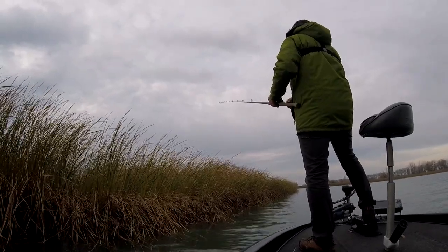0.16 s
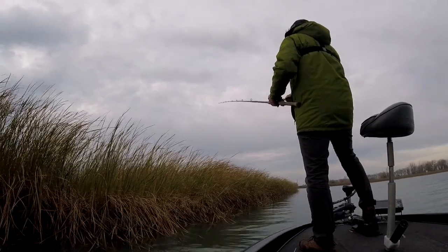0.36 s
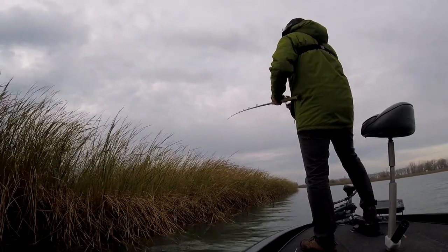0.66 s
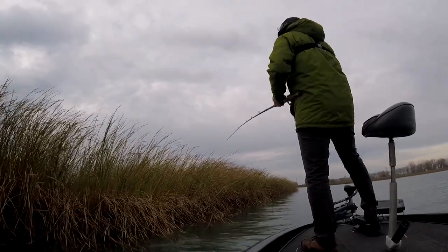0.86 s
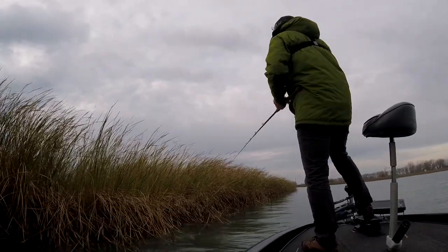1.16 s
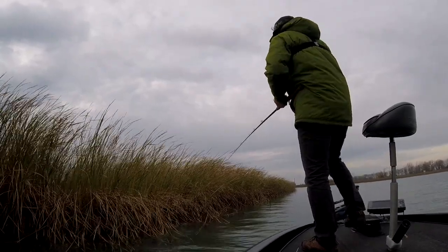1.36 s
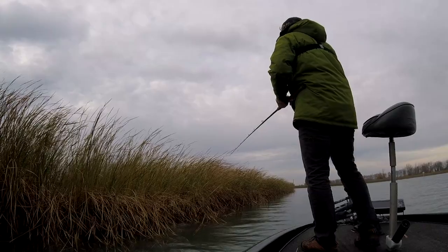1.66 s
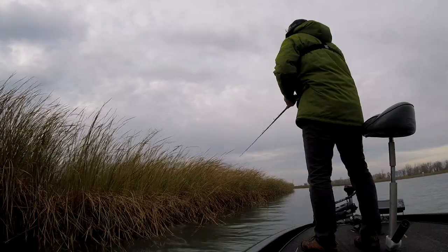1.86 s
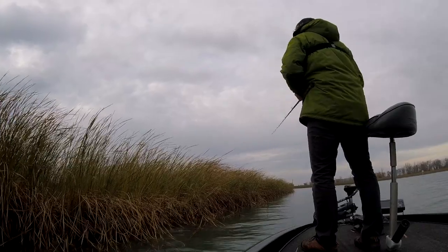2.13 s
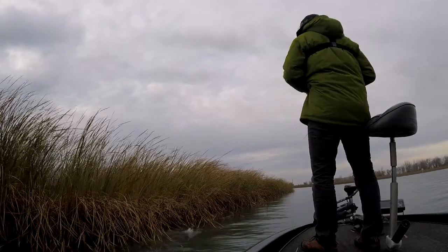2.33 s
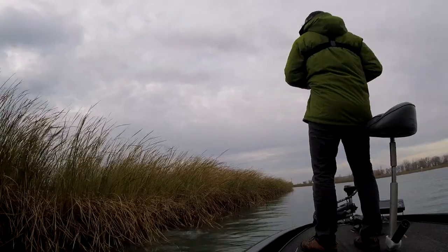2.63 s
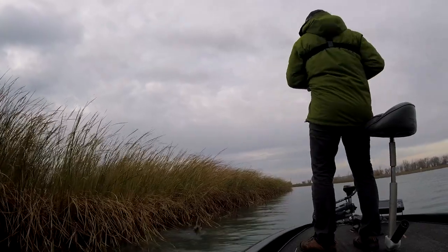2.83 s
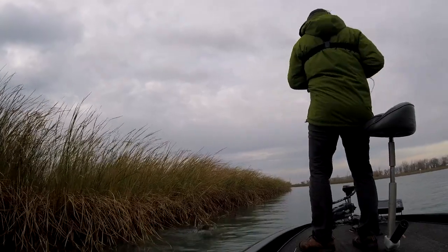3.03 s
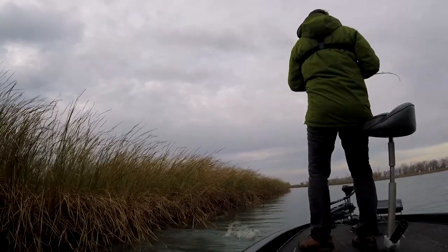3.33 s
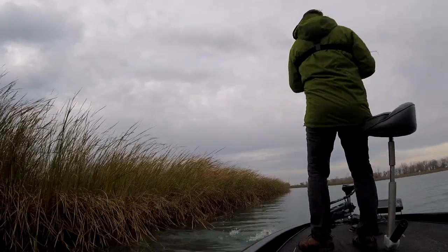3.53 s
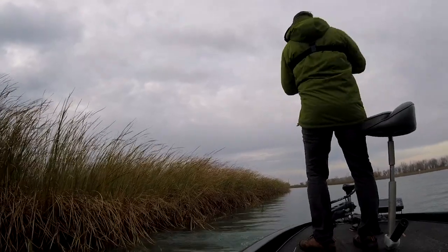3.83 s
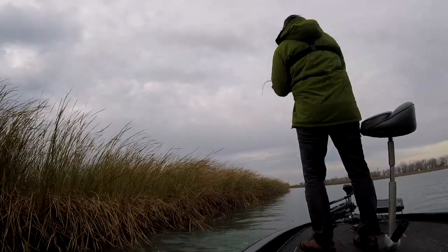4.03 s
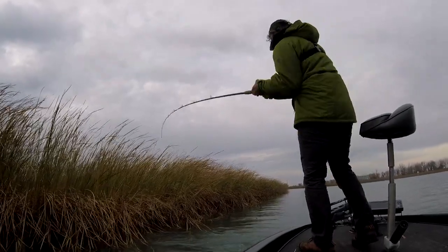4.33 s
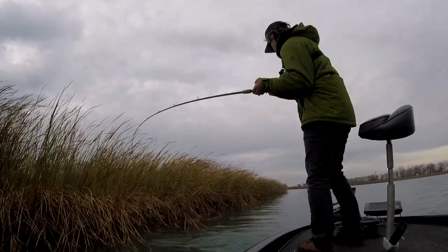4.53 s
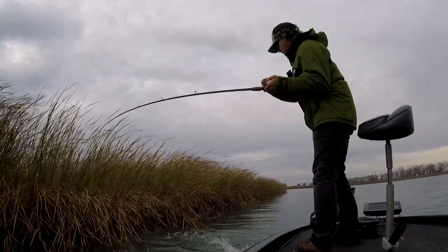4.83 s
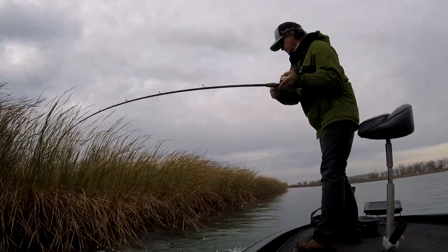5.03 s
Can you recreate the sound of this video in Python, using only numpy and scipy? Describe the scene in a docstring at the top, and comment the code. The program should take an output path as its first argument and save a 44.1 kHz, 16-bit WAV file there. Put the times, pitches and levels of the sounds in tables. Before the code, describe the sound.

A boat hull booms low under wind rumble, heavy footfalls thump the hollow deck, then water splashes and plops alongside with small tackle clicks.

```python
"""A small fishing boat lies by a reed bed on a windy lake, heard through a microphone in a closed case on the hull.
From the start the hull booms at two resonances, shaped noise gives wind and reeds, and a faint hum soon dies.
Crowds of bubbles lap beside the hull; single bubbles plop, tackle clicks as ringing partials, and from 0.9 s
feet thump on the modes of the hollow deck. The water breaks into splashing near 2 s and again from about 3 s,
while the boom and the wind grow weaker overall; a few last thumps fall near 5 s."""
import sys
import numpy as np
from scipy import signal
from scipy.fft import rfft, irfft, next_fast_len
from scipy.io import wavfile
from scipy.ndimage import uniform_filter1d

SR = 44100
rng = np.random.default_rng(int(sys.argv[2]) if len(sys.argv) > 2 else 0)


def transcribe(u):
    """Save the signal u as a 16-bit wav file named by the first command-line argument.

    u: samples, shape (n,) or (channels, n), limited to [-1, 1]; the rate is SR.
    q: integer samples, one column per channel.
    """
    v = np.clip(np.atleast_2d(u).T, -1, 1)
    q = np.round(v * 32767).astype(np.int16)
    wavfile.write(sys.argv[1], SR, q)


N = 228526
T = np.arange(N) / SR


def undb(db):
    """Logarithmic level: decibels to amplitude gain."""
    return 10 ** (np.asarray(db) / 20)


def unit(x):
    """Power normalization: scale to rms 1."""
    return x / np.sqrt(np.mean(x ** 2))


def gains(table):
    """Level envelope: interpolate each dB column over time and return it as gains."""
    seconds, *columns = np.transpose(table)
    return [undb(np.interp(T, seconds, column)) for column in columns]


def add(out, start_s, x):
    """Superposition: mix x into out from start_s."""
    i = max(int(start_s * SR), 0)
    out[i:i + len(x)] += x[:max(N - i, 0)]


def fade(t, t60):
    """Exponential damping: 60 dB down after t60 seconds."""
    return np.exp(-np.log(1000) * t / t60)


def swell(start_s, attack_s, hold_s, t60):
    """Build-up and decay of energy: a smooth rise, a hold and an exponential release."""
    rise = np.sin(np.pi / 2 * np.clip((T - start_s) / attack_s, 0, 1)) ** 2
    return rise * fade(np.maximum(T - start_s - attack_s - hold_s, 0), t60)


def walk(rate):
    """Random modulation: smoothed noise of rms 1, with a fresh value rate times a second."""
    k = int(SR / rate)
    steps = np.repeat(rng.standard_normal(N // k + 1), k)
    smooth = uniform_filter1d(uniform_filter1d(steps, k), k)
    return unit(smooth[:N])


def colour(x, points):
    """Minimum-phase filtering: a causal response through (Hz, dB) points."""
    size = next_fast_len(len(x) + 4096, True)
    hz, db = np.transpose(points)
    f = np.maximum(np.arange(size // 2 + 1) * SR / size, 1)
    log_gain = np.log(undb(np.interp(np.log(f), np.log(hz), db)))
    # folding the cepstrum onto positive times makes the filter causal
    cepstrum = irfft(log_gain, size)
    cepstrum[1:size // 2] *= 2
    cepstrum[size // 2 + 1:] = 0
    response = np.exp(rfft(cepstrum))
    return irfft(rfft(x, size) * response, size)[:len(x)]


def bubble(hz, rise, swell_s):
    """Bubble resonance: a sine swells, rings and dies while its pitch glides by rise octaves."""
    age = np.arange(int(8 * swell_s * SR) + 2) / (swell_s * SR)
    pitch = hz * 2 ** (rise * np.tanh(age / 4))
    envelope = (age * np.exp(1 - age)) ** 1.18
    return envelope * np.sin(2 * np.pi * np.cumsum(pitch) / SR)


def froth(low_hz, high_hz, cycles, spread_db, count, wash_db=1, longest=5):
    """Incoherent summation: many random bubbles over white noise; spread_db sets how their strengths vary."""
    out = np.zeros(N)
    for when, size, rise, life, force in rng.random((count, 5)):
        hz = low_hz * (high_hz / low_hz) ** size
        # a positive spread makes a few bubbles stronger, a negative one makes a few weaker
        strength = undb(spread_db * min(-np.log(1 - force), 4))
        # most bubbles are brief, a few ring on
        stretch = longest ** (life * life) / 2
        add(out, when * T[-1], strength * bubble(hz, 0.42 * rise - .1, cycles * stretch / hz))
    return unit(out) + undb(wash_db) * rng.standard_normal(N)


# Steady rocking of the hull. Each row: time in seconds, level in dB.
HULL_ROCKING = [(0.0, -27.5), (0.5, -32.5), (1.1, -30.5), (1.6, -19), (1.9, -41.5), (2.55, -31.5),
                (2.8, -41.5), (3.3, -39), (3.85, -38), (4.15, -52), (4.55, -51), (4.8, -40), (5.18, -43)]
# Shoves of waves and shifting weight on the hull. Each row: start in seconds, level in dB,
# length of rise and hold in seconds, second resonance over the first in dB.
HULL_SHOVES = [(1.085, -16, 0.17, -11.5), (1.34, -14.5, 0.13, -2.5), (1.599, -10.5, 0.11, -8.5),
               (1.722, -14, .11, -14), (1.976, -25.5, 0.33, -5.5), (2.309, -20.5, .14, -10.5),
               (2.80, -31, 0.07, -9), (3.07, -30.5, 0.16, 3), (4.582, -33, 0.15, -2.5),
               (4.978, -27, 0.12, 6)]
SHOVE_ATTACK_S, HULL_T60_S = 0.074, .36


def hull(first_hz=47.15, second_hz=65.8, wander=0.0656, rocking_upper_db=-12, uneven_db=2.5):
    """Forced resonance: rocking and shoves drive two wandering low modes; each shove swells and rings out."""
    rocking = gains(HULL_ROCKING)[0] * undb(uneven_db * walk(24.08))
    drives = [(rocking, rocking_upper_db)]
    for start_s, db, length_s, upper_db in HULL_SHOVES:
        shove = swell(start_s, SHOVE_ATTACK_S, length_s - SHOVE_ATTACK_S, HULL_T60_S)
        drives.append((undb(db) * shove, upper_db))
    # each drive shares its power between the two resonances
    power = np.zeros((2, N))
    for drive, upper_db in drives:
        upper = undb(upper_db) ** 2
        power += np.outer([1, upper], drive ** 2) / (1 + upper)
    modes = []
    for hz in (first_hz, second_hz):
        pitch = hz * (1 + wander * walk(35))
        modes.append(unit(np.sin(2 * np.pi * np.cumsum(pitch) / SR)))
    return np.sum(np.sqrt(power) * modes, axis=0)


# Wind buffeting the case. Each row: time in seconds, level in dB before the gain wind_db.
WIND_GUSTS = [(0.0, -44), (0.8, -41), (1.05, -35), (1.65, -32.5), (2.05, -41), (2.85, -46), (3.2, -50.5),
              (4.1, -58), (4.55, -54), (4.68, -49.5), (5.18, -56)]
# Spectrum of the buffeting. Each row: frequency in Hz, relative level in dB.
WIND_COLOUR = [(15, -27.5), (45, 9.5), (70, 9), (100, 4.5), (130, 2.5), (165, -5), (198, 2.5), (235, -13),
               (400, -20), (2000, -59)]


def wind(wind_db=3):
    """Turbulent pressure: eddies buffet the case with a low rumble, as filtered noise under a gust envelope."""
    gust, = gains(WIND_GUSTS)
    return undb(wind_db) * gust * unit(colour(rng.standard_normal(N), WIND_COLOUR))


# Spectrum of the distant reeds. Each row: frequency in Hz, relative level in dB.
REED_COLOUR = [(250, -3.5), (450, -1), (700, -16.5), (1400, -12), (3000, -21.5), (4100, -27.5),
               (5400, -20.5), (7500, -17), (10000, -21.5), (12000, -26.5), (15000, -30)]


def reeds(level_db=-59, sway_db=0.85):
    """Broadband flow noise: wind in the reed bed hisses as filtered noise that sways slightly in level."""
    return unit(colour(rng.standard_normal(N), REED_COLOUR)) * undb(level_db + sway_db * walk(3.7))


def hum(hz=150.6, second_db=-55, third_db=-61):
    """Harmonic series: partials two and three of a wavering tone, perhaps an electric bow motor, fade out."""
    phase = 2 * np.pi * np.cumsum(hz * (1 + 0.0072 * walk(11.8))) / SR
    tone = undb(second_db) * np.sin(2 * phase) + undb(third_db) * np.sin(3 * phase)
    return tone * np.interp(T, [.5, 1.1], [1, 0])


# Water that never stops lapping, before the gains in water(): slosh, splatter and spray levels in dB.
LAPPING_LEVELS = (-60, -68, -76)
# Surges beside the hull. Each row: start in seconds, build-up in seconds, ebb t60 in seconds, then,
# before the gains in water(), slosh of large bubbles in dB, splatter of small bubbles in dB, spray in dB.
WATER_SURGES = [(0.40, .08, 2.6, -64, -60.5, -62), (0.62, .36, .4, -55, -59, -62),
                (1.34, 0.071, 1.4, -53, -62, -72.5), (1.86, 0.11, 0.58, -56, -63, -67),
                (2.059, 0.11, 0.45, -51, -49.5, -52), (2.31, .10, 0.54, -61, -57, -65.5),
                (2.73, 0.055, 1.5, -64, -57.5, -76), (2.86, .15, 0.79, -56, -49.5, -55.5),
                (3.13, 0.068, 0.51, -60, -47.5, -48.5), (3.25, 0.056, 1.16, -46.5, -45, -54.5),
                (3.38, 0.17, 2.6, -43.5, -47.5, -54.5), (3.56, 0.21, 1.26, -43, -46.5, -56.5),
                (3.95, 0.19, 3.1, -65, -56, -62), (4.28, 0.1, 1.56, -44.5, -49, -62),
                (4.42, 0.28, 0.88, -39, -56, -52.5), (4.80, 0.27, 0.5, -38.5, -47, -45.5)]
CREST_SHARE = .5  # a surge stays at its crest for this share of its build-up


def surges():
    """Addition of powers: each surge builds, crests and ebbs over the steady lapping, in three bands."""
    power = undb(LAPPING_LEVELS)[:, None] ** 2
    for start_s, build_s, ebb_t60, *levels_db in WATER_SURGES:
        surge = swell(start_s, build_s, CREST_SHARE * build_s, ebb_t60)
        power = power + np.outer(undb(levels_db), surge) ** 2
    return np.sqrt(power)


# Slaps of water. Each row: start in seconds, initial rms of slosh and splatter together in dB before
# the gains in water(), t60 in seconds, splatter over slosh in dB.
WATER_SLAPS = [(2.119, -46, 0.073, 0), (2.179, -43, 0.061, 16), (2.220, -42.5, 0.057, 23),
               (2.417, -40, 0.035, -11), (3.074, -39, 0.055, 12), (3.203, -43, 0.047, 29),
               (3.227, -36.5, 0.02, 17), (3.29, -32.5, 0.086, -4), (3.576, -41, 0.022, 16),
               (3.827, -37.5, 0.22, -19), (4.012, -41.5, 0.037, -20), (4.610, -37, 0.072, -37),
               (4.725, -38, 0.12, -14), (4.808, -29.5, 0.07, -14), (4.914, -39, 0.12, -11),
               (4.947, -35.5, 0.092, -30)]
# Slosh at the side of the hull. Each row: frequency in Hz, relative level in dB.
SLOSH_SIDE_COLOUR = [(110, -15), (180, 4.5), (300, -6.5), (430, -4), (650, 3.5), (1100, 1.5), (2500, -43.5)]
# Slosh at the bow. Each row: frequency in Hz, relative level in dB.
SLOSH_BOW_COLOUR = [(130, -19), (220, 2.5), (300, -3.5), (450, -5), (680, 3.5), (1000, 1.5), (1400, -2),
                    (3000, -36.5)]
# Splatter, and the wet splat of a plop. Each row: frequency in Hz, relative level in dB.
SPLATTER_COLOUR = [(600, -18.5), (1200, -6.5), (2000, -1), (2700, -1), (3400, -2.5), (4100, -12.5),
                   (5000, -27.5)]
# Spray at the side of the hull. Each row: frequency in Hz, relative level in dB.
SPRAY_SIDE_COLOUR = [(3500, -9.5), (4900, -17), (5900, -2.5), (6800, -7), (8000, -16.5), (10000, -22.5),
                     (12000, -35), (15000, -30.5)]
# Spray at the bow. Each row: frequency in Hz, relative level in dB.
SPRAY_BOW_COLOUR = [(3000, -29.5), (4200, -11), (5100, -3), (5800, -2), (7000, -8.5), (10000, -10.5),
                    (11500, -28), (15000, -31)]


def water(slosh_db=1, splatter_db=0, spray_db=-1, surge_db=1.13, slap_spray_db=-9, turn_s=4.45):
    """Size sets pitch: large bubbles gurgle, small ones splatter, spray fizzes; slaps add bursts of all three."""
    slosh, splatter, spray = surges()
    t = T[:SR // 4]
    for start_s, db, t60, bright_db in WATER_SLAPS:
        burst = undb(db) * fade(t, t60) / np.hypot(1, undb(bright_db))
        add(slosh, start_s, burst)
        add(splatter, start_s, burst * undb(bright_db))
        add(spray, start_s, burst * undb(bright_db + slap_spray_db))
    large = froth(174.7, 1560, cycles=1.06, spread_db=3.0, count=5000)
    small = froth(1099.4, 3995, cycles=2.94, spread_db=1.5, count=6000)
    drops = froth(3870, 13000, cycles=3.04, spread_db=-2.5, count=8000)
    # the colour changes as the splashing moves from the bow to the side of the hull and back
    side = np.interp(T, [1.5, 1.9, turn_s, turn_s + 0.04], [0, 1, 1, 0])
    bow = 1 - side
    gurgle = side * unit(colour(large, SLOSH_SIDE_COLOUR)) + bow * unit(colour(large, SLOSH_BOW_COLOUR))
    patter = unit(colour(small, SPLATTER_COLOUR))
    fizz = side * unit(colour(drops, SPRAY_SIDE_COLOUR)) + bow * unit(colour(drops, SPRAY_BOW_COLOUR))
    mix = undb(slosh_db) * slosh * gurgle
    mix += undb(splatter_db) * splatter * patter
    mix += undb(spray_db) * spray * fizz
    return mix * undb(surge_db * walk(60))


# Single plops. Each row: start in seconds, starting pitch in Hz, pitch glide in octaves (negative falls),
# swell time in ms, level of the main bubble in dB.
WATER_PLOPS = [(0.576, 1670, 0.51, 3.3, -41), (0.813, 878, 0.25, 14, -49), (2.853, 1886, -0.17, 3.2, -41.5),
               (2.9428, 843, 0.93, 3.3, -28), (3.3005, 1960, 0.067, 0.69, -17),
               (3.346, 1120, 0.74, 1.7, -29.5), (3.456, 606, 0.83, 3.7, -35), (3.494, 229, -0.7, 4.5, -22),
               (3.516, 1660, 0.26, 2.2, -34.5), (3.569, 294, 0.83, 5.6, -32), (4.400, 790, -0.19, 3.6, -35),
               (4.428, 248.4, 0.68, 15, -32), (4.648, 327, -0.62, 4.1, -26.5),
               (4.668, 366, -0.23, 2.5, -27), (4.722, 860, -0.66, 2.8, -27.5), (4.727, 262, 0.63, 3.1, -27),
               (4.800, 301, -0.051, 4.4, -31), (4.950, 676, -0.043, 12, -36)]


def plops(splat_db=-18, splat_t60=0.0089, companion=1.8, companion_db=-13):
    """Pinch-off of air pockets: each rings as a bubble with a weaker, higher companion and a short wet splat."""
    out, t = np.zeros(N), T[:SR // 8]
    for start_s, hz, rise, swell_ms, db in WATER_PLOPS:
        swell_s = swell_ms / 1000
        splat = unit(colour(rng.standard_normal(len(t)), SPLATTER_COLOUR)) * fade(t, splat_t60)
        add(out, start_s, undb(db) * bubble(hz, rise, swell_s))
        add(out, start_s, undb(db + companion_db) * bubble(companion * hz, rise, swell_s))
        add(out, start_s, undb(db + splat_db) * splat)
    return out


# Clicks of tackle. Each row: start in seconds, peak level in dB, ring t60 in seconds.
TACKLE_CLICKS = [(0.589, -41.5, 0.059), (0.9, -26, 0.035), (1.256, -37, 0.017), (1.3109, -27.5, 0.15),
                 (2.006, -42, 0.015), (2.327, -39, 0.022), (2.472, -46, .015), (2.489, -36.5, 0.0078),
                 (4.165, -31, 0.012), (4.729, -26.5, 0.042), (4.81, -35, 0.06), (4.957, -28.5, 0.048),
                 (5.048, -29, 0.018)]
# Partials of the tackle. Each row: frequency in Hz, relative level in dB.
TACKLE_MODES = [(1610, -1), (2875, -8.5), (4690, -13.5), (5000, 3.5), (5200, -2.5), (5530, 0), (6050, -14)]
# Crack of a hard contact, on tackle or deck. Each row: frequency in Hz, relative level in dB.
CRACK_COLOUR = [(300, 0), (800, -6.5), (1600, -5.5), (2200, -13), (2900, -10.5), (4000, -14.5),
                (5200, -2.5), (6500, -13), (9000, -27.5), (15000, -40)]


def tackle(crack_db=2, crack_share=0.96, attack_s=0.00013):
    """Impact of small hard bodies: a noisy crack and a bright ring of modes decay together."""
    out, t = np.zeros(N), T[:SR // 4]
    for start_s, db, t60 in TACKLE_CLICKS:
        ring = sum(undb(mode_db) * np.sin(2 * np.pi * (hz * t + rng.random()))
                   for hz, mode_db in TACKLE_MODES)
        crack = unit(colour(rng.standard_normal(len(t)), CRACK_COLOUR)) * fade(t, crack_share * t60)
        click = unit(ring) * fade(t, t60) + undb(crack_db) * crack
        click *= 1 - np.exp(-t / attack_s)
        add(out, start_s, undb(db) * click / np.abs(click).max())
    return out


# Thumps on the deck. Each row: start in seconds, peak level in dB, contact time in ms,
# t60 in seconds of the damping under the foot, bass in dB by where the foot lands.
DECK_THUMPS = [(0.914, -25, 6.1, 0.44, 11), (1.024, -19, 9.2, 0.96, -10), (1.102, -17.5, 3.6, 0.29, -14),
               (1.307, -5, 0.58, 0.38, 17.5), (1.381, -8, 7.3, 0.35, -21), (1.617, -8, 6.2, 0.39, -3),
               (1.904, -36, 7.9, 0.22, -3), (2.325, -21, 2.6, 0.24, 0), (2.718, -35, 3.6, .8, -3),
               (2.962, -37, 5.1, 0.34, -10), (4.169, -38.5, 3.8, 0.4, -15), (4.240, -33.5, 3.0, 0.85, -11),
               (4.975, -21.5, 5.5, 1, -24), (5.006, -13.5, 4.9, 0.34, -23), (5.084, -21.5, 5.2, 0.24, -14)]
# Modes of the hollow deck. Each row: frequency in Hz, relative level in dB before the bass and the contact
# reshape it, t60 in seconds before the foot damps it further.
DECK_MODES = [(126, -11.5, 0.17), (142, -9, 0.2), (170, 6, 0.067), (197, 6.5, 0.38), (238, -6.5, 0.1),
              (252.5, -12.5, 0.41), (301, -2.5, 0.13), (385.6, -3, 0.15), (518, -7.5, 0.12),
              (663, -8, 0.08)]


def deck(crack_db=-5, crack_t60=0.11, spread=4, bass_hz=160):
    """Modal excitation: each blow rings the deck; a longer contact leaves only the low modes."""
    out, t = np.zeros(N), T[:SR // 2]
    for start_s, db, contact_ms, damping_t60, bass_db in DECK_THUMPS:
        contact = contact_ms / 1000
        ring = np.zeros(len(t))
        for k, (hz, mode_db, t60) in enumerate(DECK_MODES):
            # neighbouring modes start in opposite directions
            strength = (-1) ** k * undb(mode_db + bass_db * (hz < bass_hz))
            ring += strength * fade(t, t60) * np.sin(2 * np.pi * hz * t)
        crack = unit(colour(rng.standard_normal(len(t)), CRACK_COLOUR)) * undb(crack_db) * fade(t, crack_t60)
        push = t ** 2 * np.exp(-6 * t / contact)
        # the ringing takes a few contact times to spread through the boards
        ring = ring * (1 - np.exp(-t / (spread * contact))) * fade(t, damping_t60)
        blow = signal.fftconvolve(ring + crack, push)[:len(t)]
        add(out, start_s, undb(db) * blow / np.abs(blow).max())
    return out


def scene():
    """Linear superposition: all sources add at one microphone."""
    return (hull() + wind() + reeds() + hum() + water() + plops() + tackle() + deck())[None]


TOP_HZ = 15300


def record(dry):
    """Band limiting: a steep elliptic low-pass removes the treble above TOP_HZ."""
    return signal.sosfilt(signal.ellip(10, .2, 80, TOP_HZ, fs=SR, output="sos"), dry)


dry = scene()
out = record(dry)
transcribe(out)
```